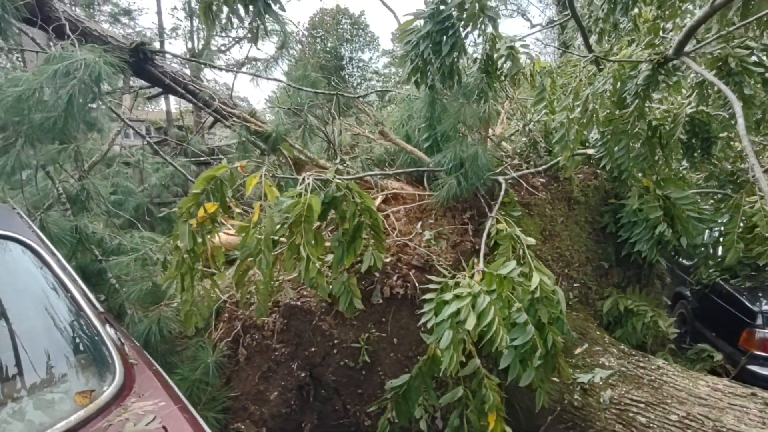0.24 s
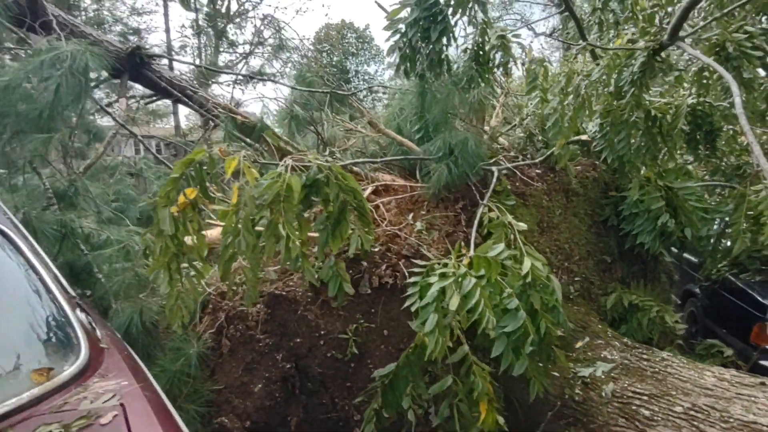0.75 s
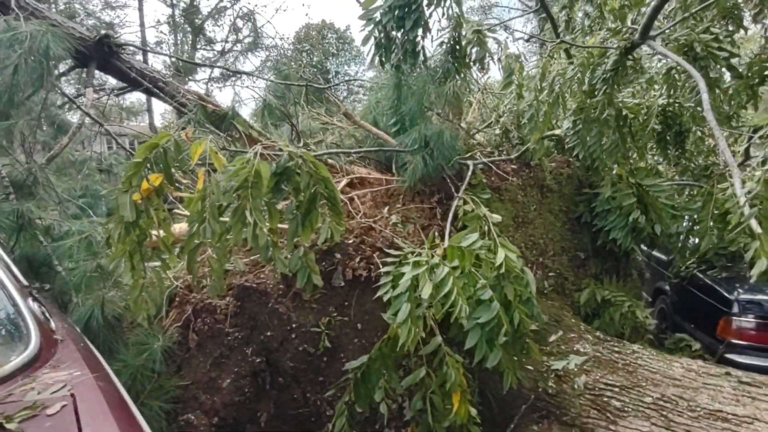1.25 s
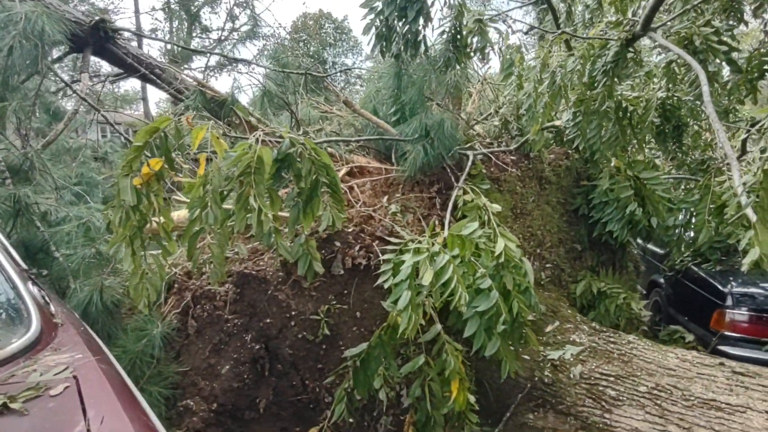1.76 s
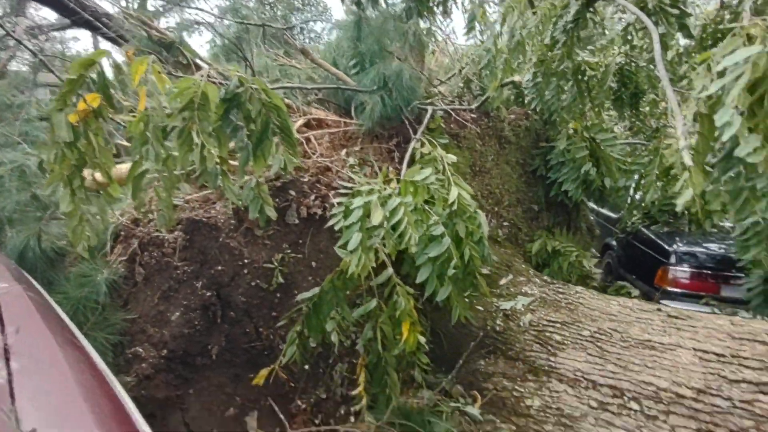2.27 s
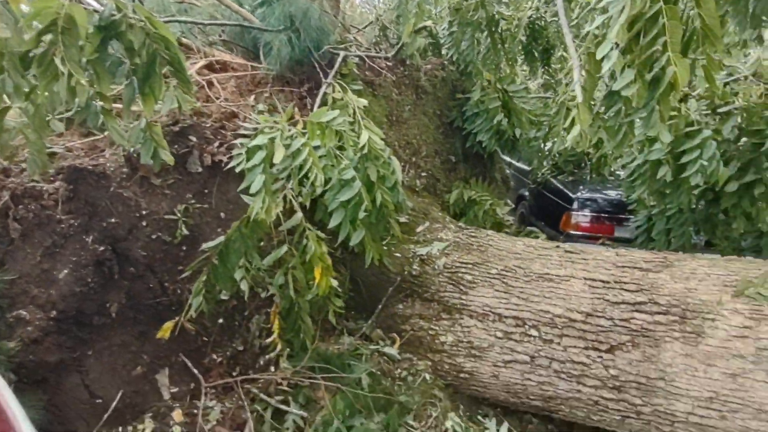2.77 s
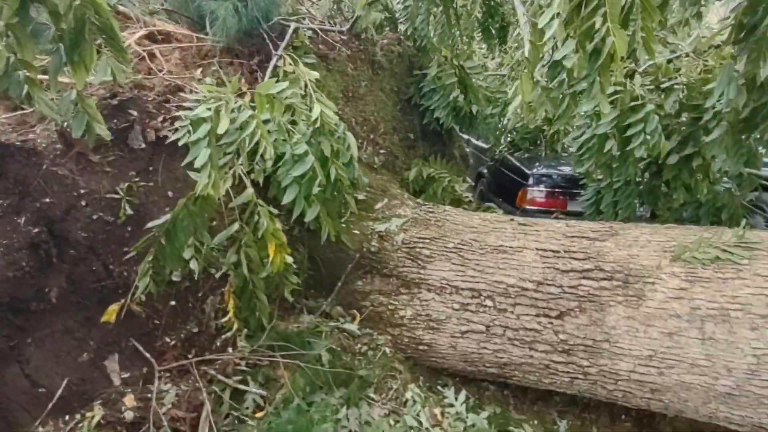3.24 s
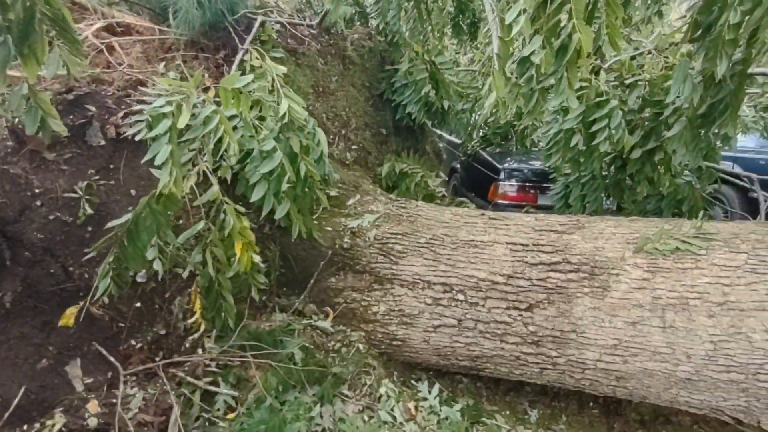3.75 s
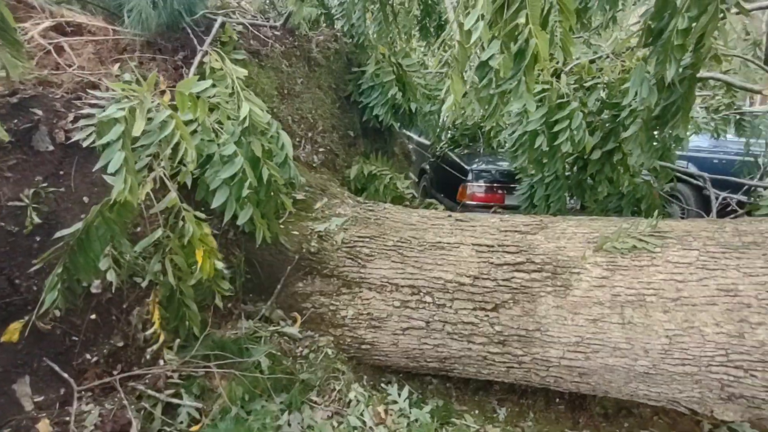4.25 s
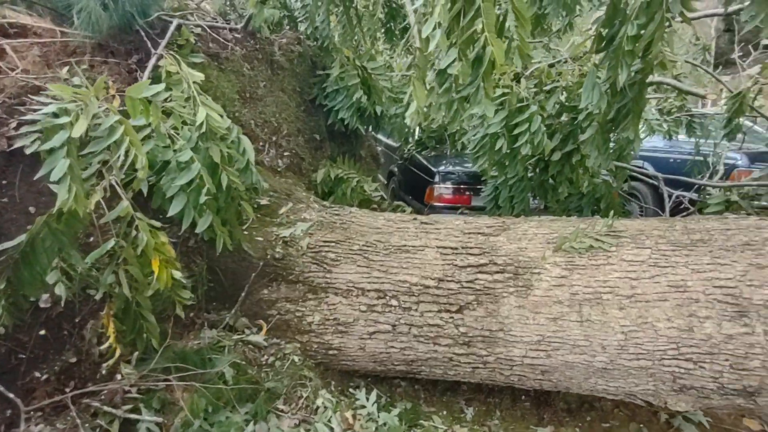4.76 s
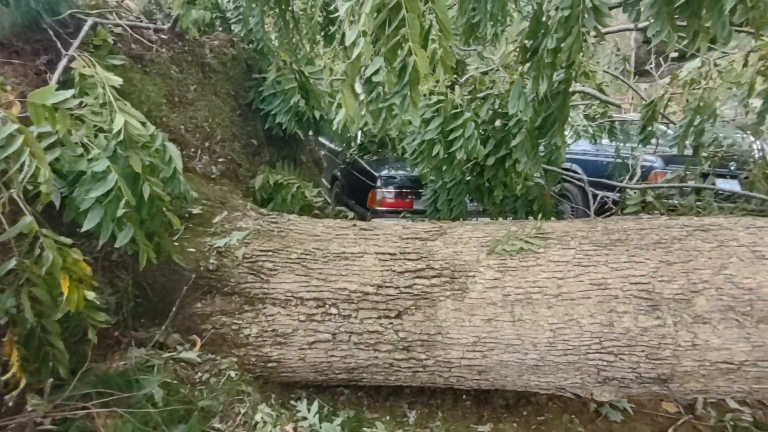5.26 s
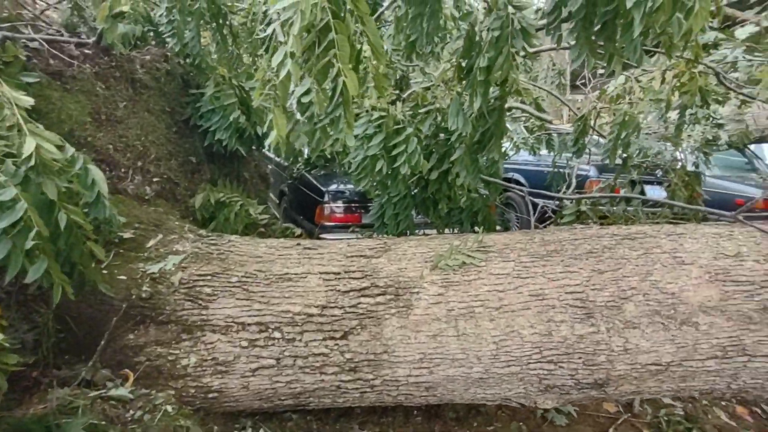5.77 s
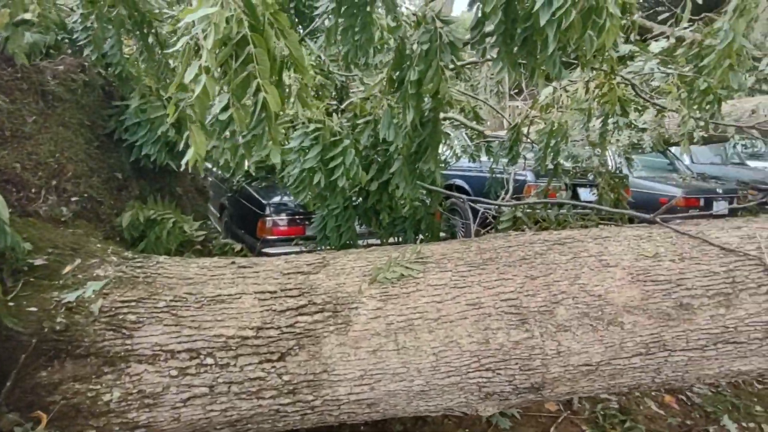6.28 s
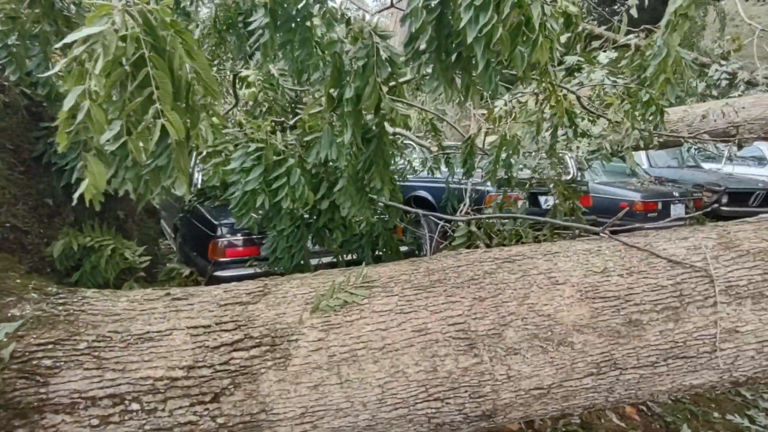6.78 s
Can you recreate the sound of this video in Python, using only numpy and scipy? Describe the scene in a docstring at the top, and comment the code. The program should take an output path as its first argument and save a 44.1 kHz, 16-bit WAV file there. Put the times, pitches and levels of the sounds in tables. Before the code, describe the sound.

An electric chainsaw cuts, bogs down and runs free again over the constant low hum of a petrol generator.

```python
"""A yard: a small four-stroke generator drones, and some way off to the right an electric chainsaw cuts.
The saw bites deeper, bogs down and runs free again; its gear whine, rattle and fan hiss follow the load,
and the chain slaps the bar. The drone is the exhaust, heard direct and by reflections in the yard.
The hand-held pair of microphones turns slowly, so the drone's colour and the saw's position drift."""
import sys
import numpy as np
from scipy import signal
from scipy.io import wavfile
from scipy.ndimage import uniform_filter1d

SR = 44100
rng = np.random.default_rng(int(sys.argv[2]) if len(sys.argv) > 2 else 0)


def unload_wav(signal):
    """Save mono or channel-first audio to the path in sys.argv[1] as 16-bit WAV at rate SR, clipped to [-1, 1]."""
    wavfile.write(
        sys.argv[1],
        SR,
        np.round(np.clip(np.atleast_2d(signal).T, -1, 1) * 32767).astype(np.int16),
    )


N = 309582
T = np.arange(N) / SR

FIRING_HZ = 30.33  # one firing every two turns of the crank
GEAR_TEETH = 38
BITE_S, BITE_TAKES_S = 2.43, 0.37  # the bar sinks deeper into the wood
FREE_S, FREE_TAKES_S = 5.1, 0.28  # the bar comes out

# The saw's run through the cut (time [s], gear mesh [Hz], drive [dB], fan [dB])
SAW_RUN = [(0, 1461, -33.5, -64), (0.5, 1489, -33, -62.5), (1.2, 1489, -30, -61), (2.3, 1490, -27, -61),
           (2.9, 1457, -29, -59.5), (3.1, 1401, -30.5, -61), (3.7, 1382, -29.5, -60.5),
           (4.1, 1259, -32.5, -63), (4.3, 1227, -32.5, -63), (4.55, 1426, -31, -59),
           (4.8, 1512, -29.5, -58.5), (5.15, 1538, -30, -55), (5.4, 1530, -29.5, -52.5),
           (5.6, 1536, -29.5, -56), (5.9, 1536, -31, -52), (6.42, 1530, -31, -53.5),
           (6.65, 1522, -30, -56.5), (7.02, 1515, -29, -55)]


def gain_of(db):
    """Decibels to a factor."""
    return 10 ** (np.asarray(db) / 20)


def unit_rms(x):
    """Scales to rms 1."""
    return x / np.sqrt(np.mean(x ** 2) + 1e-20)


def spectrum_at(points, hz):
    """A spectrum, straight between its points on a log-frequency axis."""
    f, value = np.transpose(points)
    return np.interp(np.log(hz + 1), np.log(f + 1), value)


def curves(rows, t):
    """The columns of a table at the times t."""
    times, *columns = np.transpose(rows)
    return [np.interp(t, times, column) for column in columns]


def step(at, takes):
    """A soft step from 0 to 1."""
    return .5 + .5 * np.tanh((T - at) / takes)


def wander(top_hz):
    """A wandering curve of rms 1."""
    t, rates = T[::64], np.geomspace(.3, top_hz, 24)
    sway = sum(np.sin(2 * np.pi * (hz * t + rng.random())) / np.sqrt(hz) for hz in rates)
    return np.interp(T, t, unit_rms(sway))


def noise(colour, patchy_db):
    """Two unrelated noises of one colour that share drifting patches."""
    hz, _, bins = signal.stft(rng.standard_normal((2, N)), SR, nperseg=1024, noverlap=768)
    patches = uniform_filter1d(rng.standard_normal(bins.shape[1:]), size=5, axis=0)
    patches = unit_rms(uniform_filter1d(patches, size=14, axis=1))
    bins *= gain_of(spectrum_at(colour, hz)[:, None] + patchy_db * patches)
    return unit_rms(signal.istft(bins, SR, nperseg=1024, noverlap=768)[1][:, :N])


def haze(turns, width_hz):
    """Two unrelated narrow noises riding on the phase curve turns."""
    r, t = np.exp(-8 * np.pi * width_hz / SR), T[::8]
    real, imag = rng.standard_normal((2, 2, len(t)))
    drift = signal.lfilter([1], [1, -2 * r, r * r], real + 1j * imag)
    return unit_rms(np.array([np.interp(T, t, d) * np.exp(2j * np.pi * turns) for d in drift]).real)


def hazy_tone(turns, blur_hz):
    """A clean core in a narrow haze; a blur over 20 Hz starts to swallow the core."""
    core = np.sqrt(2) * np.cos(2 * np.pi * (turns + rng.random() + np.array([[0], [1 / 4]])))
    return .5 * min(20 / blur_hz, 1) * core + .87 * haze(turns, blur_hz)


def generator():
    """Exhaust harmonics; reflections shift their level and phase at each microphone as the pair turns."""
    # Exhaust harmonics (order [x firing rate], level [dB])
    harmonics = [(2, -60), (3, -64), (4, -48.5), (5, -41.5), (6, -42), (7, -57.5), (8, -48), (9, -52),
                 (10, -59), (11, -63.5), (12, -70.5)]
    # Paths to the pair (strength [factor], delay [ms], its drift [ms/s], left lag [ms], its drift [ms/s])
    paths = [(1, 0, 0, .237, .036), (.456, 2.625, .062, -.749, .177), (.328, 8.682, .306, -.065, -.066),
             (-.322, 21.136, .01, .493, -.025), (-.251, 36.281, .219, -2.17, .331)]
    cycles = np.cumsum(FIRING_HZ * (1 + .0015 * wander(top_hz=3))) / SR
    uneven = uniform_filter1d(rng.standard_normal((len(harmonics), N // 64 + 1)), size=24, axis=1)
    t, out = T[::64], np.zeros((2, N))
    arrivals = [(strength, ms + drift * t + np.array([lag + lag_drift * t, 0 * t]))
                for strength, ms, drift, lag, lag_drift in paths]
    for (k, db), wobble in zip(harmonics, unit_rms(uneven)):
        heard = sum(strength * np.exp(-2j * np.pi * k * FIRING_HZ * ms / 1000) for strength, ms in arrivals)
        heard *= gain_of(db + 0.6 * wobble[:len(t)])  # no two firings are alike
        # two muffler chambers delay the orders near their pitch
        low, mid, high = min(k, 6), max(k - 6, 0), max(k - 8, 0)
        muffler = -1.2 * low * (2 * k - low) + .28 * mid * (mid - 1) - 1.13 * high * (high - 1)
        tone = np.sqrt(2) * np.exp(1j * (2 * np.pi * k * cycles + muffler))
        out += (np.array([np.interp(T, t, mic) for mic in heard]) * tone).real
    return out


def gear_whine(shaft, sag, bright_db, tone_db):
    """Tones of the meshing teeth; the higher the order, the sooner the load chokes it."""
    # Gear tones (order [x shaft rate], level [dB], share of the bright ring [factor], blur [Hz])
    tones = [(36.7, -46.5, 0.9, 11), (38.07, -45, 0, 15), (40.2, -53.5, 0, 13), (40.5, -44, 0, 23),
             (76.4, -46.5, 0.2, 24), (114.1, -49.5, 0.7, 50)]
    return sum(gain_of(db + share * bright_db + (3 - share) * tone_db - 25 * sag * (k / GEAR_TEETH - 1))
               * hazy_tone(k * shaft, blur) for k, db, share, blur in tones)


def gear_whistle(shaft, fan_db):
    """High mesh orders that swell with the fan."""
    # Whistles (order [x shaft rate], level against the fan [dB], blur [Hz])
    whistles = [(187.6, -2, 70), (226, -18, 66)]
    return sum(gain_of(db + fan_db + 0.59 * wander(top_hz=24.3)) * hazy_tone(k * shaft, blur)
               for k, db, blur in whistles)


def gear_rasp(shaft, bright_db, tone_db):
    """Broad humps of noise near whole and half multiples of the mesh."""
    # Humps (centre [x mesh rate], width [Hz], level [dB], share of the bright ring [factor])
    humps = [(1, 170, -41.5, 0.44), (1.501, 202, -48.5, 0.4), (2, 200, -53.5, 0.5), (2.5, 327, -48.5, 1),
             (2.9, 270, -52, 1.15)]
    return sum(gain_of(db + share * bright_db + (3.5 - share) * tone_db)
               * haze(k * GEAR_TEETH * shaft, width) for k, width, db, share in humps)


def casing_noise(drive_db, sag):
    """The casing's rush rises with the drive and drops as the speed sags."""
    # Casing spectrum (frequency [Hz], density [dB])
    colour = [(900, -36), (1250, -12), (1800, -4), (2300, -3), (2650, -5.5), (3300, -6), (4400, -12),
              (5100, -17), (7000, -31), (10500, -50), (12000, -88), (15500, -99)]
    return gain_of(drive_db - 10.5 - 15 * sag) * noise(colour, patchy_db=1.5)


def cutting_noise(free):
    """The chain scrapes wood and bar, more softly once it is out of the cut."""
    # Spectrum of wood and bar (frequency [Hz], density [dB])
    colour = [(500, -60), (650, -1.5), (760, 1.5), (1000, 2), (1200, -0.5), (1900, 0.5), (2600, -2),
              (3600, -52.5)]
    return gain_of(-39 - 6.5 * free + 1.1 * wander(top_hz=24.9)) * noise(colour, patchy_db=1.0)


def fan_hiss(fan_db, free):
    """Air from the fan; it flutters more when the saw runs free."""
    # Fan spectrum (frequency [Hz], density [dB])
    colour = [(3000, -12), (5000, -4), (6300, 4), (8500, 1), (10000, -3.5), (11500, -10), (13800, -6),
              (15800, -10.5)]
    flutter_db = (0.86 + 1.04 * free) * wander(top_hz=22.0)
    return gain_of(fan_db + 5.0 + flutter_db) * noise(colour, patchy_db=2.0)


def rattle(shaft, deep, free):
    """Loose parts knock twice a turn, soft then hard, over a steady scrape; casing and bar ring."""
    # Modes (frequency [Hz], width [Hz], shallow cut [dB], deep cut [dB], out of the wood [dB])
    modes = [(759, 30, -54.5, -53, -62.5), (820.5, 8.5, -50.5, -70, -83), (926, 39, -78, -50.5, -62),
             (948, 22, -53, -57, -70), (1040.4, 24, -50.5, -55.5, -69), (1197, 21, -52.5, -57, -60.5),
             (1317, 58, -49.5, -52.5, -61), (1975, 100, -43, -102, -65), (2042, 83, -56, -57, -44.5),
             (2127, 26, -49, -52.5, -51), (2286, 220, -69, -43.5, -42.5), (2610, 61, -50, -51, -48),
             (2897, 49, -56, -49, -50)]
    hits = np.flatnonzero(np.diff(np.floor(2 * shaft)))
    force, late = rng.random((len(hits), 2)).T
    blows = np.zeros(N + SR)
    blows[hits + (late * .001 * SR).astype(int)] = gain_of(4 * force + 8 * (np.arange(len(hits)) % 2))
    t = np.arange(600) / SR
    knocks = unit_rms(signal.oaconvolve(blows, t * np.exp(-t / .0013))[:N])
    shaking = (.22 + knocks) * rng.standard_normal((2, N))
    out = np.zeros((2, N))
    for hz, width, shallow_db, deep_db, free_db in modes:
        r = np.exp(-np.pi * width / SR)
        resonator = [1, 0, -1, 1, -2 * r * np.cos(2 * np.pi * hz / SR), r * r]
        ring = unit_rms(signal.sosfilt([resonator, resonator], shaking))  # twice: steep flanks
        out += gain_of(shallow_db + (deep_db - shallow_db) * deep + (free_db - deep_db) * free) * ring
    return out


def chainsaw():
    """Gear, casing, cut, fan and rattle under the changing load: a direct row and a scattered row."""
    mesh_hz, drive_db, fan_db = curves(SAW_RUN, T)
    sag = 1 - mesh_hz / mesh_hz.max()
    deep, free = step(BITE_S, BITE_TAKES_S), step(FREE_S, FREE_TAKES_S)
    bright_db = 2 * (drive_db + 31) - 22 * sag  # the bright ring outgrows the drive; sag chokes it
    # in the shallow cut the mesh tone loses part of what the bright ring gains
    tone_db = -0.34 - 0.24 * (bright_db + 5.5) * (1 - deep)
    judder = (.0015 + .06 * sag) * wander(top_hz=40)
    shaft = np.cumsum(mesh_hz * (1 + judder)) / SR / GEAR_TEETH  # [turns]
    angle = 2 * np.pi * shaft
    # the gear runs out of true: it binds once and twice a turn, unevenly
    throb_db = (1.2 + .6 * wander(top_hz=4)) * np.cos(angle) + 2.2 * np.cos(2 * angle - 1.5)
    link_db = 0.39 * np.cos(angle / 3.7 + wander(top_hz=1.96))  # one stiff link comes round
    tones = gear_whine(shaft, sag, bright_db, tone_db) + gear_whistle(shaft, fan_db)
    tones *= gain_of(-30 * sag + .6 * throb_db + 3 * link_db)  # load chokes the clean tones
    body = gear_rasp(shaft, bright_db, tone_db) + casing_noise(drive_db, sag)
    body *= gain_of(throb_db + link_db)
    cut = cutting_noise(free)
    fan = fan_hiss(fan_db, free) * gain_of(0.063 * throb_db)
    loose_parts = rattle(shaft, deep, free) * gain_of(0.23 * (drive_db - np.mean(drive_db)))
    return tones + body + cut + fan + loose_parts


def yard_wash():
    """The low, steady background of the yard."""
    # Background spectrum (frequency [Hz], density [dB])
    colour = [(20, -30), (45, -29), (70, 3.5), (100, 5.5), (150, -0.5), (280, -6.5), (380, -4.5), (600, -5),
              (1500, -45.5)]
    return gain_of(-49.5) * noise(colour, patchy_db=.5)


def chain_slaps():
    """The chain slaps the bar: a short wavering ring, and a jolt that rings the first two mesh tones."""
    # Slaps (time [s], level [dB], ring of the bar [Hz])
    slaps = [(0.541, -31, 1940), (0.6587, -26, 1900), (0.7462, -27.5, 2050), (1.2288, -27.5, 1900),
             (1.3603, -30, 2634), (2.325, -32, 3030), (2.5047, -27, 2875), (2.636, -32, 2944),
             (2.7087, -28, 3000), (2.811, -31, 2305), (3.053, -34, 2800), (3.1328, -29, 2428),
             (3.2845, -36, 2360), (3.355, -31, 2310), (3.4704, -31, 2345), (3.6497, -28, 2230),
             (3.7626, -31, 2306), (3.8584, -32, 2380), (3.9367, -35, 2617), (4.051, -32, 2333),
             (4.1427, -32.5, 2542), (4.235, -33, 2450), (4.325, -27.5, 2420), (4.7833, -28.5, 2317),
             (4.905, -30, 2270), (4.9585, -26, 2252), (5.1036, -28, 2380), (5.2029, -30, 2256),
             (5.377, -28, 2344), (5.451, -40, 2389), (5.5776, -28.5, 2420), (5.6256, -62, 2252),
             (6.1437, -28.5, 2320), (6.2954, -29, 2216), (6.566, -27.5, 2087)]
    out, t = np.zeros((2, N + SR)), np.arange(2000) / SR
    wavers = unit_rms(uniform_filter1d(rng.standard_normal((len(slaps), 2, len(t))), size=80))
    for (start_s, db, ring_hz), waver in zip(slaps, wavers):
        mesh_hz = curves(SAW_RUN, start_s)[0]
        pitch = np.array([ring_hz, mesh_hz, 2 * mesh_hz])[:, None, None] + 90 * waver
        bar, mesh, octave = np.sin(2 * np.pi * np.cumsum(pitch, axis=2) / SR)
        envelope = gain_of(db - 60 * t / .065) * (1 - np.exp(-t / .0005)) ** 2
        at = round(start_s * SR)
        out[:, at:at + len(t)] += envelope * (bar + 0.74 * mesh + (.15 if start_s < BITE_S else .75) * octave)
    return out[:, :N]


def microphone_pair(sound):
    """Both microphones get the direct sound, the left one later and mixed with scattered sound."""
    # Turning of the pair (time [s], left lag [ms], direct share [0-1], left over right [dB])
    bearing = [(0, 0.42, 0.58, -4), (1, 0.29, 0.23, -2.5), (2, 0.36, 0.28, -2.5), (3.5, 0.42, 0.92, -2.5),
               (5, 0.48, 0.85, -2.5), (7.02, 0.53, 0.84, -1.5)]
    # Likeness of the two channels (frequency [Hz], coherence [0-1])
    likeness = [(60, .99), (250, .9), (800, .9), (2000, .8), (4000, .68), (8000, .35), (15000, .3)]
    # Shading between the microphones (frequency [Hz], left over right [dB])
    shading = [(200, 1), (1000, 0), (2400, -1), (4400, 1), (8000, -4), (15000, -2)]
    hz, t, (direct, scattered) = signal.stft(sound, SR, nperseg=512, noverlap=384)
    lag_ms, direct_share, lean_db = curves(bearing, t)
    coherence = np.clip(spectrum_at(likeness, hz)[:, None] * direct_share, 0, 1)
    delayed = direct * np.exp(-2j * np.pi * hz[:, None] * lag_ms / 1000)
    left = coherence * delayed + np.sqrt(1 - coherence ** 2) * scattered
    lean = gain_of((lean_db + spectrum_at(shading, hz)[:, None]) / 2)
    return signal.istft(np.array([left * lean, direct / lean]), SR, nperseg=512, noverlap=384)[1][:, :N]


def scene():
    """The drone, with the saw and the yard's wash placed to the right by the pair."""
    return generator() + microphone_pair(chainsaw() + chain_slaps() + yard_wash())


def record(dry):
    """The recorder's band ends steeply at 15790 Hz."""
    low_pass = signal.firwin(1023, 15790, window=("kaiser", 9), fs=SR)
    return signal.oaconvolve(dry, low_pass[None], "same")


dry = scene()
out = record(dry)
unload_wav(out)
```